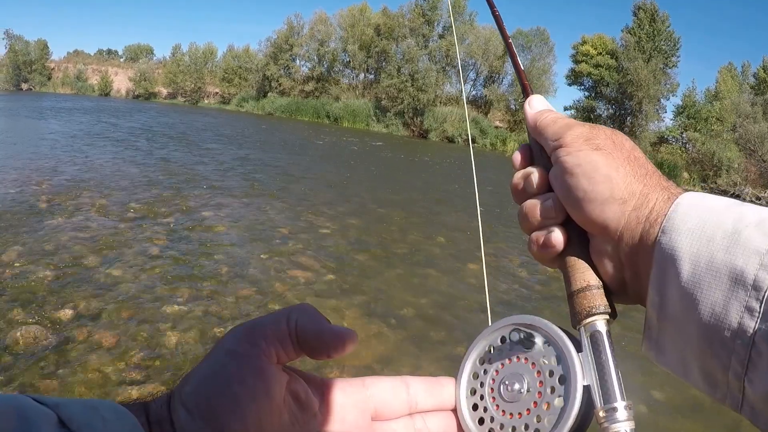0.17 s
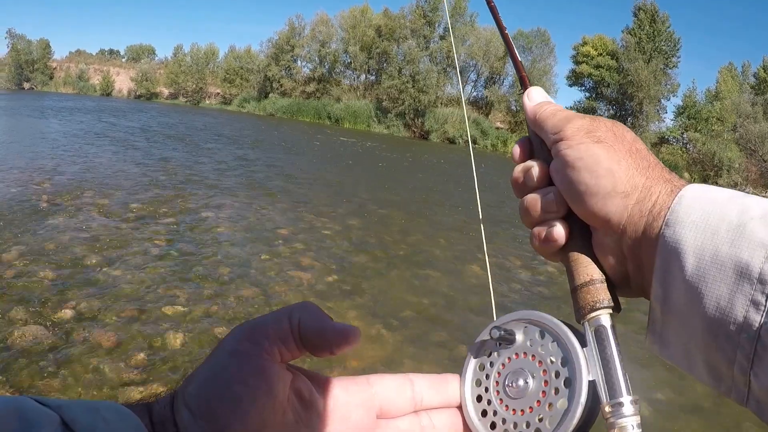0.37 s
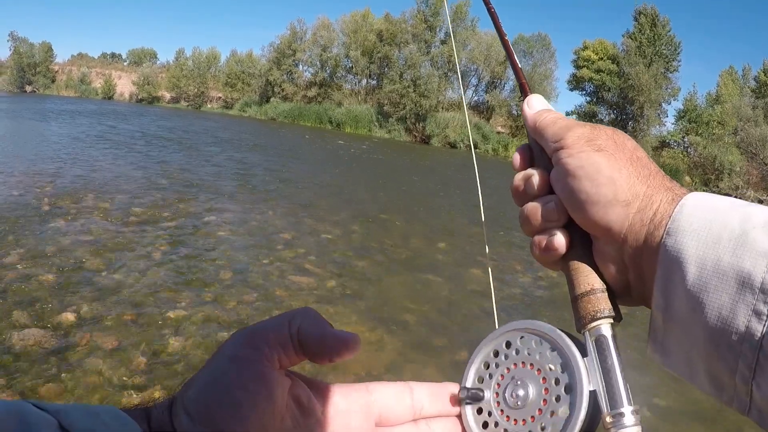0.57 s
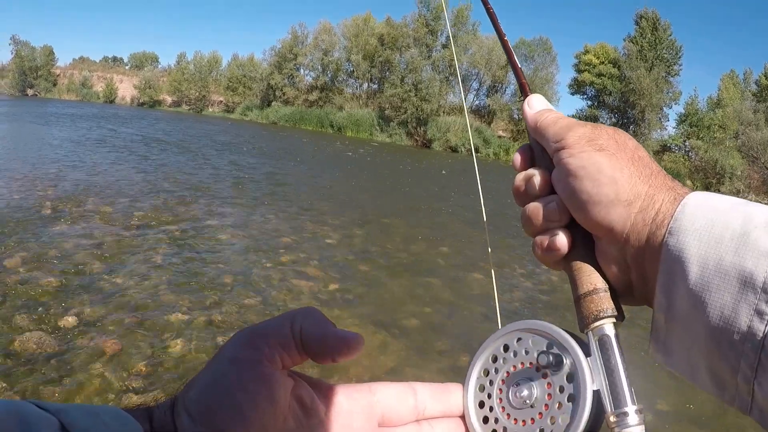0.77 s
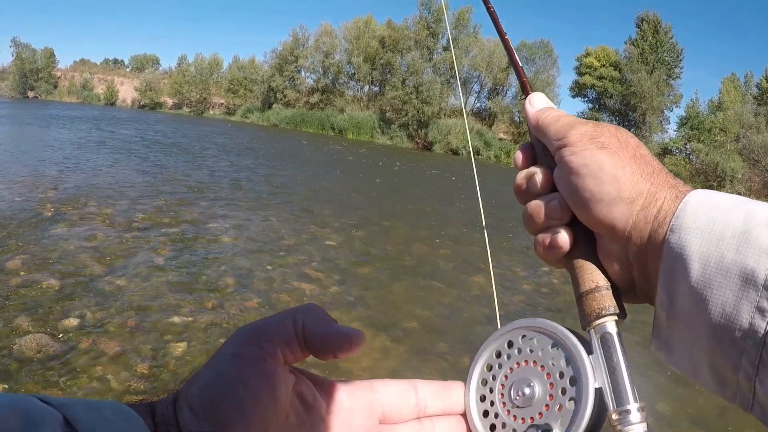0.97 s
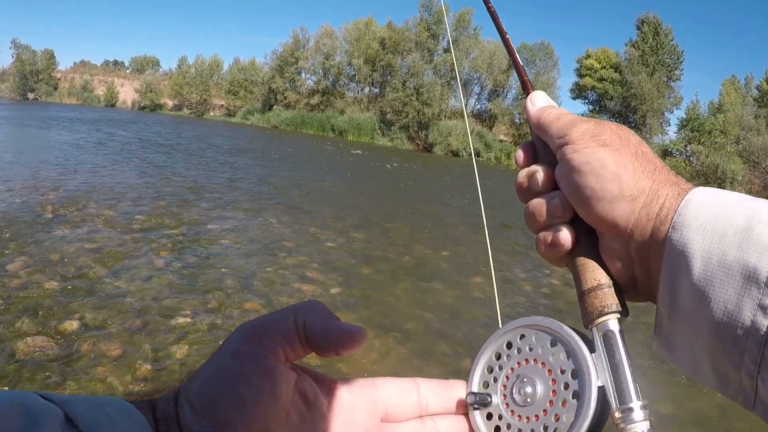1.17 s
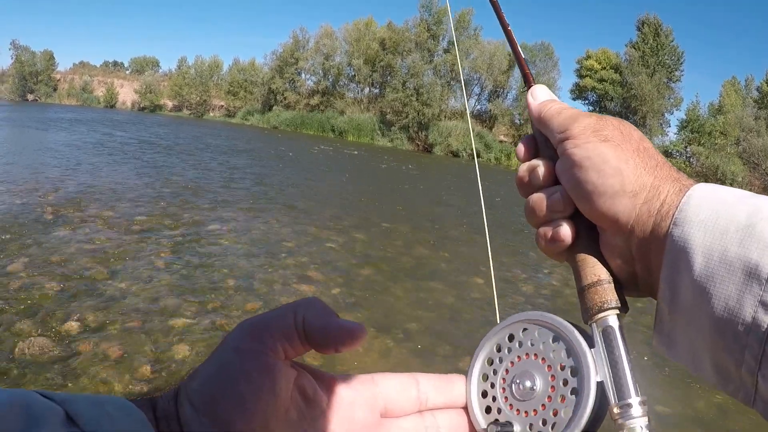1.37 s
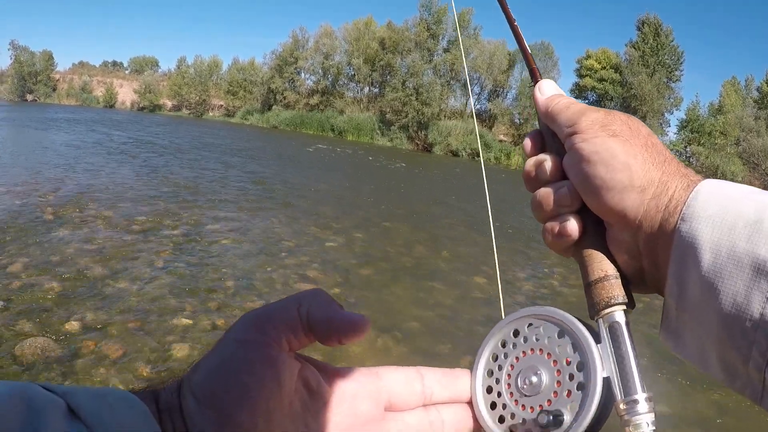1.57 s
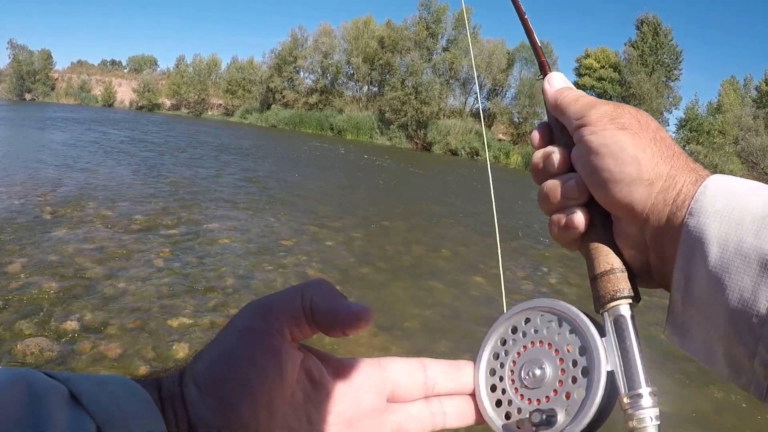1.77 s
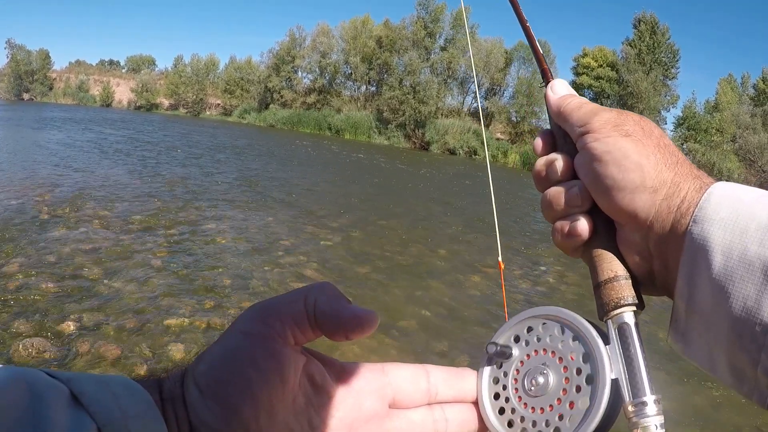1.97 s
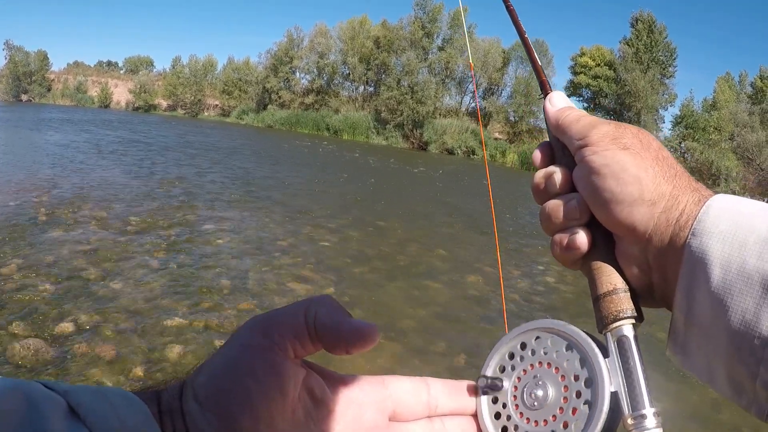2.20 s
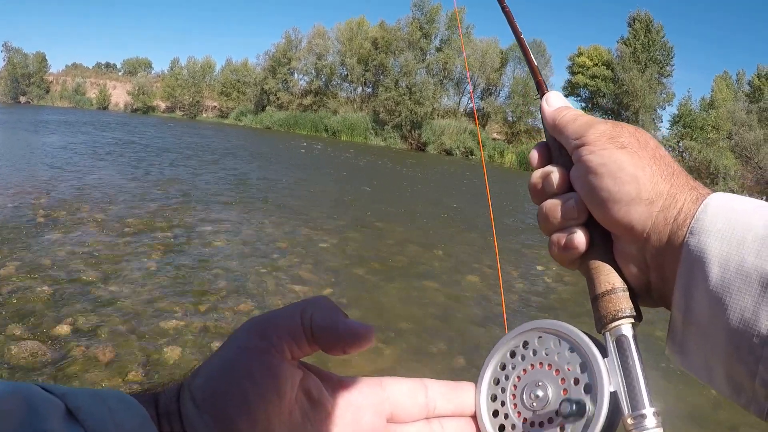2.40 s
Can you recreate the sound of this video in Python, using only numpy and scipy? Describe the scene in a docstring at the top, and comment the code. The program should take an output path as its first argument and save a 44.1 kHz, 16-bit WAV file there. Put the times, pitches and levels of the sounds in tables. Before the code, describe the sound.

Close, harsh ratcheting of a metal fishing reel runs throughout, uneven in speed, fast first, slower and more separately clicking in the middle, fast again at the end, over steady river wash, faint wind and small low knocks on the microphone.

```python
"""Beside a river, line runs off a click-and-pawl fly reel held close to a camera.
The pawl chatters over every tooth and rings the metal spool and frame, made as a bank of resonances;
the ring swirls as the spool turns. Behind it the river rushes (shaped noise) and gurgles (rising
damped tones), with light wind (low noise) and a few soft bumps on the camera (short damped tones)."""
import sys
import numpy as np
from scipy import signal
from scipy.fft import rfft, irfft, next_fast_len
from scipy.io import wavfile
from scipy.ndimage import map_coordinates

SR = 44100
rng = np.random.default_rng(int(sys.argv[2]) if len(sys.argv) > 2 else 0)


def master_out(mix):
    """Clip the mix to full scale and print it as 16-bit PCM to the path in sys.argv[1]."""
    frames = np.transpose(np.atleast_2d(mix))
    ceiling = np.clip(frames, -1, 1)
    pcm = np.round(ceiling * 32767).astype(np.int16)
    wavfile.write(sys.argv[1], SR, pcm)


N = 112014
TIME = np.arange(N) / SR
LEFT_RIGHT = np.array([[1], [-1]])


def amp(db):
    """Decibels to gain."""
    return 10 ** (np.asarray(db) / 20)


def unit(x):
    """Scale to rms 1."""
    return x / np.sqrt(np.mean(x ** 2) + 1e-20)


def along(points, hz):
    """Read (frequency [Hz], value) points on a log frequency axis."""
    f, v = np.transpose(points)
    return np.interp(np.log(hz + 1), np.log(f + 1), v)


def curve(rows):
    """One value per sample from (time [s], value) rows."""
    return np.interp(TIME, *np.transpose(rows))


def wobble(rate):
    """A smooth random curve, rate knots a second."""
    knots = rng.standard_normal(int(N * rate / SR) + 4)
    return map_coordinates(knots, [np.arange(N) * rate / SR])


def filtered(x, response):
    """Filter x by a complex response of frequency."""
    m = next_fast_len(N + SR // 4)
    return irfft(rfft(x, m) * response(np.fft.rfftfreq(m, 1 / SR)), m)[..., :N]


def sides(pan_db):
    """Left and right gains for a level difference, at constant mean power."""
    gains = amp(LEFT_RIGHT * pan_db / 2)
    return gains / np.sqrt(np.mean(gains ** 2, axis=0))


def stereo(pair, alike, pan):
    """Blend a mid and a side signal so that left and right are as alike as asked, then pan by frequency."""
    def mid_side_gains(hz):
        turn = np.arccos(np.clip(along(alike, hz), -1, 1)) / 2
        return np.array([np.cos(turn), np.sin(turn)])

    mid, side = filtered(pair, mid_side_gains)
    return filtered(np.array([mid + side, mid - side]), lambda hz: sides(along(pan, hz)))


def blip(start, hz, length, rise):
    """A damped tone with a soft start and an envelope peak of 1; rise is its relative pitch gain per second."""
    t = np.maximum(TIME - start, 0)
    envelope = t / length * np.exp(1 - t / length)
    return envelope * np.sin(2 * np.pi * hz * t * (1 + rise * t / 2))


def place(seconds, values):
    """Add each value at its nearest sample."""
    samples = np.clip(np.round(seconds * SR), 0, None).astype(int)
    return np.bincount(samples.ravel(), values.ravel(), N)[:N]


# first crest [teeth]; how long before each crest the pawl slips [s]
FIRST_TOOTH, SLIP_LEAD_S = .21, .0018
JITTER_S, TOOTH_SCATTER_DB = .00004, 0.3
# each skitter holds, then decays
CHATTER_HOLD_S, CHATTER_DECAY_S = 0.00062, 0.0021
# power share of the skitter that is new at each tooth; carry-over of the rest from tooth to tooth
CHATTER_FRESH, CHATTER_MEMORY = .45, .88
# from the slip to the landing on the next tooth
FLIGHT_S, FLIGHT_SCATTER_S = .0008, .00005
LANDING_DB, LANDING_SOFT_HZ = 0, 4830
RATTLE_DB = -21  # steady noise against the chatter


def pawl(tooth):
    """At every tooth the pawl skitters off the crest, much as at the tooth before, then lands on the next."""
    age = np.arange(SR // 200) / SR
    slips = np.interp(np.arange(FIRST_TOOTH, tooth[-1]), tooth, TIME) - SLIP_LEAD_S
    chance = rng.standard_normal((len(slips), 3))
    slips = slips + JITTER_S * chance[:, 0]
    size = amp(TOOTH_SCATTER_DB * chance[:, 1])

    fresh, habit = rng.standard_normal((2, 2, len(slips), len(age)))
    habit = unit(signal.lfilter([1], [1, -CHATTER_MEMORY], habit, axis=1))
    bursts = np.sqrt(CHATTER_FRESH) * fresh + np.sqrt(1 - CHATTER_FRESH) * habit
    bursts = bursts * np.exp(-np.maximum(age - CHATTER_HOLD_S, 0) / CHATTER_DECAY_S)
    bursts = size[:, None] * bursts / np.linalg.norm(bursts, axis=2, keepdims=True)
    chatter = unit(np.array([place(slips[:, None] + age, b) for b in bursts]))

    landing = unit(place(slips + FLIGHT_S + FLIGHT_SCATTER_S * chance[:, 2], size))
    landing = filtered(landing, lambda f: 1 / (1 + (f / LANDING_SOFT_HZ) ** 6))
    landing = np.array([landing, 0 * landing])  # mid only
    rattle = rng.standard_normal((2, N))
    return chatter + amp(LANDING_DB) * landing + amp(RATTLE_DB) * rattle


# ringing modes of spool and frame: (frequency [Hz], width [Hz], relative level [dB])
REEL_MODES = [(1703, 79, -11.5), (2160, 94, -9.5), (2577, 226, -12.5), (2821, 68, -2), (3175, 320, -5.5),
              (3753, 56, 1), (3960, 95, 1.5), (4626, 550, -10.5), (5245, 118, -8), (6200, 486, -4),
              (7420, 567, -4), (8275, 144, -4), (8977, 340, -6.5), (10200, 240, -30.5), (11570, 790, -23.5),
              (13900, 510, -67)]
# phase between the two microphone ports: (frequency [Hz], left lead [rad])
REEL_LEAD = [(1700, 1.58), (2700, 1.03), (5400, -1.27), (6100, -0.4), (7200, -2), (7800, -2), (8800, -2),
             (9800, 0), (12500, -2)]


def spool_and_frame(force):
    """Metal modes, alternating in sign, ring under the pawl's force and reach the two ports out of phase."""
    def body(f):
        total = 0
        for k, (centre, width, db) in enumerate(REEL_MODES):
            damping = 1j * f * width
            total = total + (-1) ** k * amp(db) * damping / (centre * centre - f * f + damping)
        return total

    return filtered(force, lambda f: body(f) * np.exp(.5j * LEFT_RIGHT * along(REEL_LEAD, f)))


# how each range of the ring follows the spool: (centre [Hz], level per doubling of speed [dB],
# then swing [dB] and loudest tooth [teeth] for the patterns that come 2, 3 and 4 times a turn)
SWIRL = [(2200, 6, 1.13, 29.3, 0.32, 10, 1, 11.8), (3330, 2.1, 1.05, 5.2, 0.66, 5, 1.1, 4.2),
         (3840, 2.1, 1.26, 26, 2.4, 10, 0.15, 28), (4300, 3.2, 1.76, 27.5, 1.3, 8.8, 1.9, 6.2),
         (6150, 2.9, 0.23, 2.2, 0.28, 1, 0.79, 3.1), (7100, 3.1, .8, 19, 0.43, 1, 0.48, 10.6)]
# brief surges and dips of the lower ring: (time [s], level [dB] at the surge centre)
SURGES = [(.11, 4), (.303, 2), (.415, 6.5), (.47, -8), (.55, 2.5), (.658, 8), (.77, -1), (.866, -0.5),
          (.985, 4.5), (1.18, 0), (1.61, 3.5), (1.785, 3.5), (1.975, 3), (2.04, 1), (2.29, 2), (2.45, 3)]
SURGE_S, SURGE_HZ, SURGE_OCTAVES = 0.016, 3300, 0.23  # half length, centre and half width
TEETH = 64  # per turn of the spool
CRUISE_HZ = 200  # teeth per second at which speed leaves the level alone


def swirl(ring, speed, tooth):
    """Each frequency range of the ring swells with speed, with the spool's angle and in brief surges."""
    surge_db = sum(db * np.exp(-((TIME - s) / SURGE_S) ** 2) for s, db in SURGES)
    centres = [row[0] for row in SWIRL]
    out = 0
    for own, (hz, speed_db, *patterns) in zip(np.eye(len(SWIRL)), SWIRL):
        surge_share = np.exp(-(np.log2(hz / SURGE_HZ) / SURGE_OCTAVES) ** 2)
        level_db = speed_db * np.log2(speed / CRUISE_HZ) + surge_db * surge_share
        for lobes, (swing_db, loudest) in enumerate(np.reshape(patterns, (-1, 2)), 2):
            level_db = level_db + swing_db * np.cos(2 * np.pi * lobes * (tooth - loudest) / TEETH)
        # neighbouring ranges crossfade between their centres
        part = filtered(ring, lambda f: along(np.c_[centres, own], f))
        out = out + amp(level_db) * part
    return out


# speed of the ratchet: (time [s], speed [teeth per second])
SPEED = [(0.0, 307.6), (0.07, 254.2), (0.08, 297.3), (0.14, 239.3), (0.17, 246.3), (0.24, 125.2),
         (0.32, 200.2), (0.37, 226.9), (0.4, 297.8), (0.44, 251.3), (0.47, 299.7), (0.52, 247.2),
         (0.54, 292.7), (0.62, 220.7), (0.63, 276.3), (0.67, 205.1), (0.7, 184.8), (0.74, 203.6),
         (0.81, 132.1), (0.84, 185.9), (0.87, 210.6), (0.9, 173.6), (0.97, 247.8), (1.01, 181.3),
         (1.04, 163.4), (1.08, 212.9), (1.14, 190.5), (1.17, 262.6), (1.24, 131.6), (1.29, 184.7),
         (1.38, 98.2), (1.41, 115.6), (1.45, 185.7), (1.52, 98.7), (1.55, 107.4), (1.61, 198.0),
         (1.66, 126.9), (1.71, 125.2), (1.76, 209.2), (1.81, 191.4), (1.85, 227.9), (1.9, 190.3),
         (1.93, 213.8), (1.95, 276.9), (2.0, 288.9), (2.03, 359.2), (2.05, 305.0), (2.09, 321.0),
         (2.14, 242.3), (2.16, 277.4), (2.23, 206.5), (2.27, 254.6), (2.31, 191.1), (2.35, 259.2),
         (2.41, 240.0), (2.43, 295.7), (2.49, 222.4), (2.54, 284.7)]
# likeness of the reel's drive at the two microphone ports: (frequency [Hz], correlation [-1 to 1])
REEL_ALIKE = [(1700, .6), (2800, 0.81), (4000, 0.75), (5300, 0.58), (6300, 0.94), (7500, 1), (9000, 0.22),
              (13000, 1)]
# balance of the reel's drive: (frequency [Hz], left-right level [dB])
REEL_PAN = [(60, 3.5), (78, 0.5), (100, -1.5), (130, -0.5), (170, 1.5), (220, 3.5), (290, 5.0), (380, 3),
            (490, 3.5), (640, -11), (830, 3), (1080, -17), (1410, -4), (1830, 3), (2380, -1.5),
            (3100, -4.5), (4030, -0.5), (5240, -1), (6820, 6), (8870, -3), (11500, 1.5), (15000, 1.5)]
REEL_DB = -20.5  # rms


def reel():
    """The turning ratchet drives the pawl, whose force rings the spool and frame."""
    speed = curve(SPEED)
    tooth = np.cumsum(speed) / SR
    # the force eases as the teeth crowd together
    force = stereo(pawl(tooth) / np.sqrt(speed), REEL_ALIKE, REEL_PAN)
    return amp(REEL_DB) * unit(swirl(spool_and_frame(force), speed, tooth))


# bumps on the camera: (time [s], envelope peak before panning [dB], frequency [Hz],
# time to the peak [s], left-right level [dB])
BUMPS = [(0.039, -14.5, 250, 0.0016, 7), (.058, -31.5, 162, 0.0074, -11), (0.089, -25, 100, 0.0026, 11),
         (.125, -33, 150, 0.0066, 0), (.285, -33.5, 147, 0.0054, 0), (.481, -21, 175, 0.0038, 5),
         (1.22, -21, 160, 0.0073, 26), (1.242, -20, 70, 0.0019, 28), (1.268, -31.5, 140, .004, 22),
         (1.318, -19.5, 133, 0.0027, 18), (1.39, -26, 74.6, 0.0023, 15), (1.459, -30, 55, 0.0051, 2),
         (1.803, -28, 164, 0.006, -14), (2.065, -32.5, 151, 0.0076, -3), (2.265, -31.5, 212, 0.0067, 4),
         (2.34, -31, 159, 0.0073, 2), (2.477, -24.5, 180, 0.0029, 18)]


def bumps():
    """Dull knocks through the camera mount, each a short damped low tone."""
    return sum(amp(db) * sides(pan) * blip(s, hz, length, 0) for s, db, hz, length, pan in BUMPS)


# colour of the rush: (frequency [Hz], relative level per Hz [dB])
RIVER_SPECTRUM = [(25, -31), (60, -20), (105, -13.5), (165, -1.5), (220, -5.5), (430, -0.5), (800, -3.5),
                  (1500, -9), (3000, -17), (9000, -19.5), (15000, -34)]
# likeness of the rush at left and right: (frequency [Hz], correlation [-1 to 1])
RIVER_ALIKE = [(50, 0.047), (200, 0.32), (400, 0.96), (700, -0.052), (1200, -0.052), (3000, .05)]
# balance of the rush: (frequency [Hz], left-right level [dB])
RIVER_PAN = [(50, -18), (300, 8), (700, 0), (1400, -4), (4000, -9)]
# the rush before its small random wobble: (time [s], level [dB])
RIVER_LEVEL = [(0, -32.5), (.4, -31), (.62, -32.5), (.76, -31), (.93, -32), (1.3, -32.5), (1.6, -30.5),
               (1.9, -32.5), (2.25, -31), (2.54, -31.5)]


def river_rush():
    """Shallow water rushes as wide shaped noise with a slight random wobble in level."""
    rush = filtered(rng.standard_normal((2, N)), lambda f: amp(along(RIVER_SPECTRUM, f)))
    rush = unit(stereo(rush, RIVER_ALIKE, RIVER_PAN))
    return rush * amp(0.92 * wobble(12)) * amp(curve(RIVER_LEVEL))


# bubble notes: (time [s], starting frequency [Hz], envelope peak [dB])
GURGLES = [(.675, 524, -28.5), (.71, 403, -27), (1.109, 314, -29), (1.165, 456, -27.5)]
GURGLE_S, GURGLE_RISE_PER_S = 0.0054, 3.2  # time to the peak; relative pitch rise


def gurgles():
    """A few bubbles ring as damped tones that rise in pitch."""
    return sum(amp(db) * blip(s, hz, GURGLE_S, GURGLE_RISE_PER_S) for s, hz, db in GURGLES)


# wind on the ports, before the left and right trims: (time [s], level [dB])
WIND = [(0.0, -46), (0.08, -33), (0.15, -41.5), (0.4, -40.5), (0.43, -54), (0.49, -35), (0.69, -48.5),
        (1.15, -42.5), (1.17, -59), (1.24, -39), (1.53, -42.5), (1.56, -59), (1.6, -42), (2.54, -55.5)]
# colour of the wind: (frequency [Hz], relative level per Hz [dB])
WIND_SPECTRUM = [(15, -3), (40, 14.5), (90, 4), (200, -22), (600, -65)]
WIND_LEFT_DB, WIND_RIGHT_DB = 3, -3


def wind():
    """Light wind buffets the ports as unrelated low noise, stronger on the left."""
    rumble = unit(filtered(rng.standard_normal((2, N)), lambda f: amp(along(WIND_SPECTRUM, f))))
    return rumble * amp(curve(WIND)) * amp([[WIND_LEFT_DB], [WIND_RIGHT_DB]])


def scene():
    """The reel in front with bumps on the camera, the river and wind behind."""
    return reel() + river_rush() + gurgles() + wind() + bumps()


TOP_HZ = 15250


def record(dry):
    """The camera keeps nothing above its band limit."""
    return filtered(dry, lambda hz: hz < TOP_HZ)


dry = scene()
out = record(dry)
master_out(out)
```